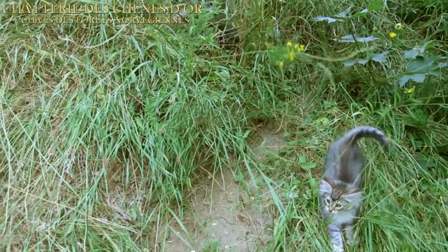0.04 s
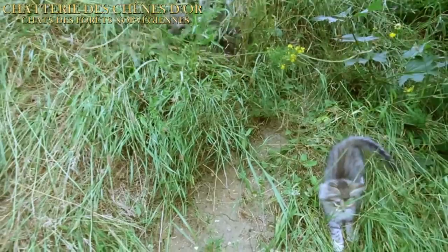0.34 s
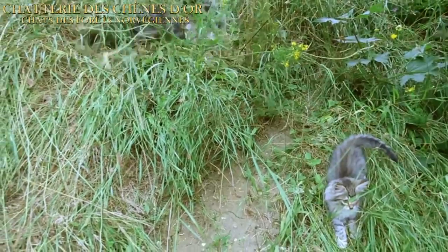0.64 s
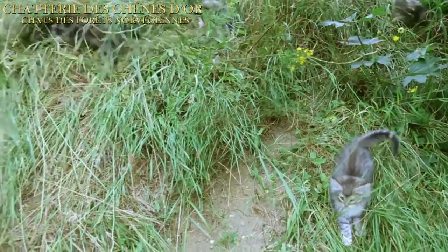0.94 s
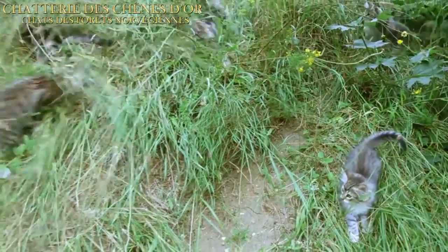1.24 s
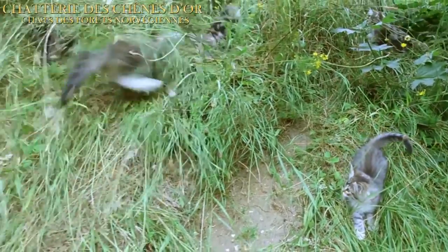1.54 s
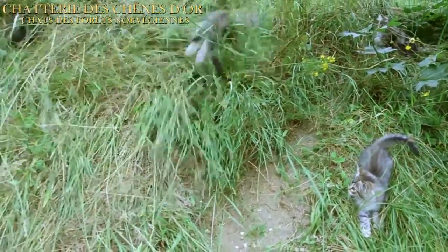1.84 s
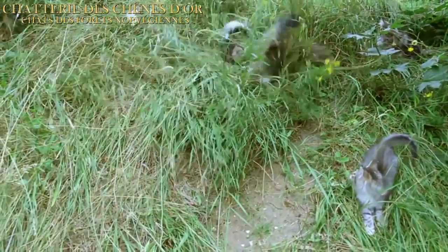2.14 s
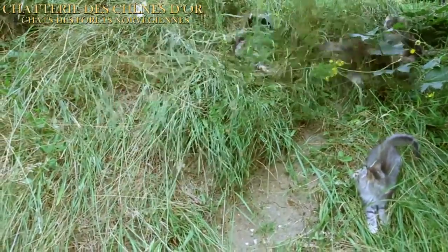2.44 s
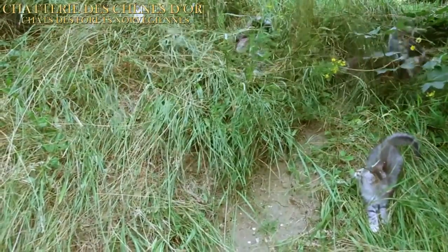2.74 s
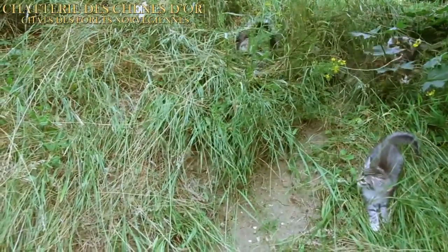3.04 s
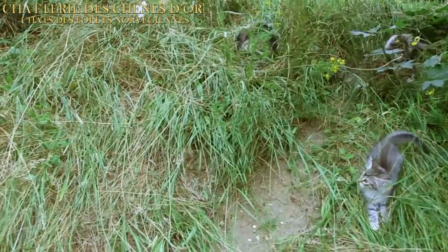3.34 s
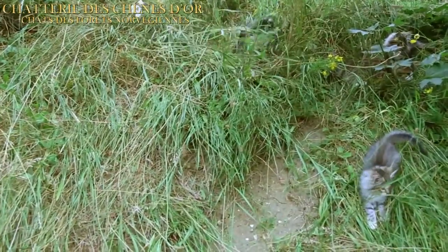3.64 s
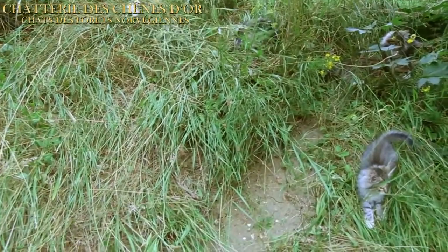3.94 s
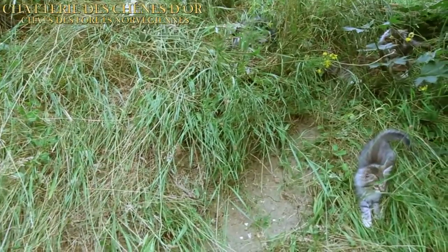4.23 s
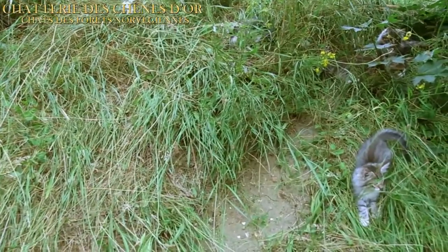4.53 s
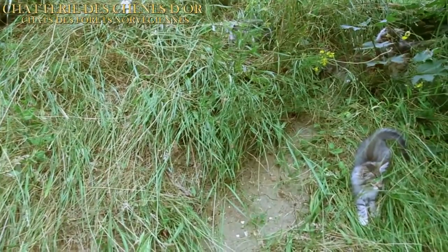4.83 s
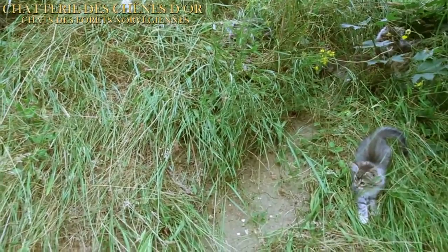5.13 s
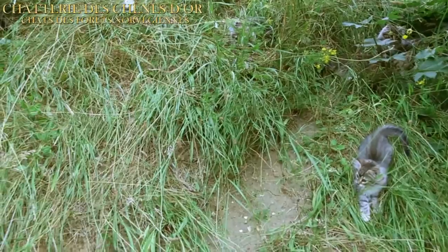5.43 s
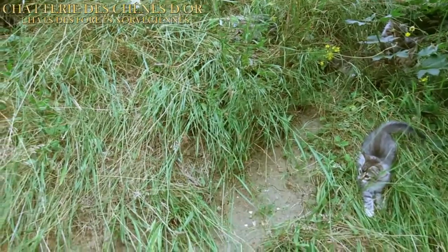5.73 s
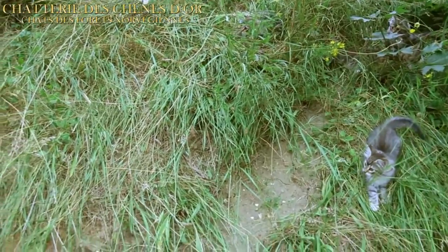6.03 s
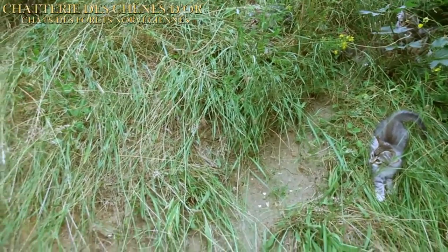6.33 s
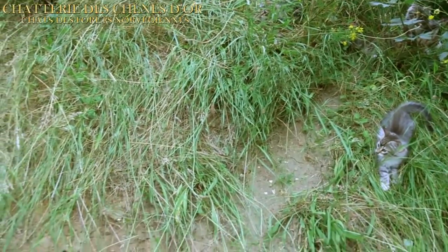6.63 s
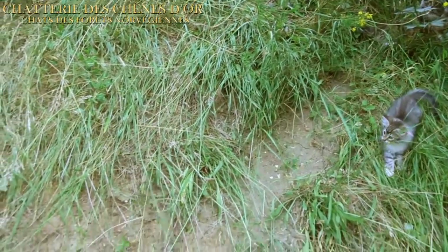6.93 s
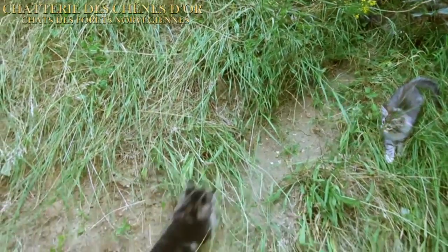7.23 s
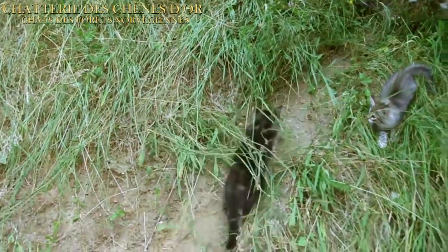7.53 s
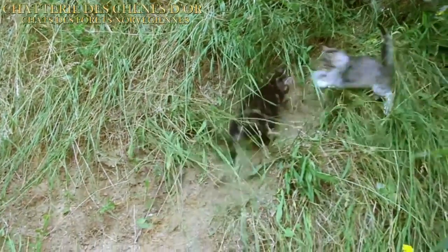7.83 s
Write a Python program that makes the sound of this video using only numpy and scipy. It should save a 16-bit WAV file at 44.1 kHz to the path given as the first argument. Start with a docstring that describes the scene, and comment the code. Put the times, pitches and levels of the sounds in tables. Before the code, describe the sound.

A small songbird opens with a quick run of gliding chirps to the left of the microphone. Faint, distant chirps follow under a high, airy hiss that surges, ticks lightly and falls away for a moment about halfway, leaving very quiet open air. After the hiss returns, another bird on the right finishes with five slightly hoarse, swooping whistles, the loudest calls. The place is grassy and open, with little echo.

```python
"""Short whistled chirps, like small songbirds in tall grass: a slurred phrase on the left, faint
distant slurs, and later five swooping calls on the right. Each note is a gliding, nearly pure tone.
Leaves scatter the whistles, and the microphone ports resonate near 3 kHz, so a note flares whenever
it glides through that pitch. A bright, steady-toned hiss, the same in both channels, swells, ticks
and drops away in steps over very quiet open air."""
import sys
import numpy as np
from scipy import signal
from scipy.fft import rfft, irfft
from scipy.io import wavfile
from scipy.ndimage import uniform_filter1d

SR = 44100
rng = np.random.default_rng(int(sys.argv[2]) if len(sys.argv) > 2 else 0)


def int16_out(signal):
    """Quantize to a 16-bit WAV file."""
    q = np.round(np.clip(np.atleast_2d(signal).T, -1, 1) * 32767)
    wavfile.write(sys.argv[1], SR, q.astype(np.int16))


N = 347067
TIME = np.arange(N) / SR
FREQ = np.maximum(np.fft.rfftfreq(N, 1 / SR), 1)
TOP_HZ = 14950


def left_bird():
    """Frequency modulation: a near bird sings one phrase of short, even glides."""
    # slurred notes: (time [s], length [s], first pitch [Hz], last pitch [Hz], level [dB])
    phrase = [(0.038, 0.024, 3420, 3300, -57), (0.061, .051, 3186, 3070, -54),
              (0.19, 0.031, 3250, 3170, -67), (0.228, 0.026, 2780, 2320, -51.5),
              (0.323, 0.033, 4160, 3760, -51.5), (0.37, 0.057, 3780, 3670, -57),
              (0.43, 0.036, 3274, 3140, -56), (0.477, 0.068, 3250, 3290, -52.5),
              (0.589, 0.014, 2620, 3140, -55.5), (0.604, .05, 2400, 2590, -51),
              (0.668, 0.033, 2850, 2930, -57), (0.747, 0.051, 2690, 2200, -53.5),
              (0.817, .022, 3010, 3100, -62.5)]
    song = whistle([slur(*row) for row in phrase], waver=.012, flutter_db=3, fade_s=.0033)
    return outdoors(song, pan_db=6, lag_s=.00004, near_db=-7.5, scatter_s=.02, far_db=-9.5, t60_s=.6)


def right_bird():
    """Frequency modulation: a near bird swoops widely, and stronger pitch jitter makes it hoarser."""
    # swooping calls: (time [s], fall [s], turning pitch [Hz], rise [s], flick [s], last pitch [Hz],
    # level [dB], sag [dB], flick [dB])
    calls = [(6.986, .044, 3073, .02, .008, 3450, -46, -19, -10),
             (7.175, .05, 3024, 0.02, .01, 3570, -44.5, -20, 4),
             (7.364, .04, 3076, 0.019, 0.017, 4840, -44, -11.5, 5),
             (7.556, .028, 3170, .017, 0.033, 1890, -43, -4, -2.5),
             (7.73, .026, 3117, .016, .031, 1850, -40.5, -2.5, -1)]
    # thin high notes: (time [s], length [s], first pitch [Hz], last pitch [Hz], level [dB])
    high_notes = [(6.869, .05, 4280, 4430, -54), (7.082, 0.033, 3930, 3970, -45.5),
                  (7.278, .024, 3890, 3960, -45), (7.461, .019, 4030, 4040, -40.5)]
    notes = [swoop(*row) for row in calls] + [slur(*row) for row in high_notes]
    song = whistle(notes, waver=.028, flutter_db=2.5, fade_s=.003)
    return outdoors(song, pan_db=-4, lag_s=-.00007, near_db=-6, scatter_s=.02, far_db=-12, t60_s=.45,
                    shade_hz=4000)


def far_bird(period_s=.093, slur_s=.0254, pitch_ratio=.85, spread_db=2):
    """Periodic repetition: a faint, distant bird gives down-slurs, alone or in evenly paced runs."""
    # runs of slurs: (time [s], length of the run [s], starting pitch [Hz], level [dB])
    runs = [(0.958, .04, 3290, -66), (1.107, .61, 3480, -67.5), (2.709, .23, 3480, -66.5),
            (3.023, .04, 3550, -67), (3.233, .04, 3550, -71), (3.56, .04, 3530, -65),
            (3.783, .04, 3740, -68), (6.245, .33, 3770, -71), (6.735, .04, 3400, -71)]
    notes = []
    for start, length, hz, db in runs:
        for at, strength in zip(np.arange(start, start + length, period_s), rng.standard_normal(8)):
            notes.append(slur(at, slur_s, hz, pitch_ratio * hz, db + spread_db * strength))
    song = whistle(notes, waver=.003, flutter_db=6.5, fade_s=.004)
    return outdoors(song, pan_db=0, lag_s=.0001, near_db=-7, scatter_s=.012, far_db=-16, t60_s=.5)


def slur(start, length, first_hz, last_hz, db):
    """A linear sweep that swells and falls back, as (time [s], pitch [Hz], level [dB]) points."""
    share = np.array([0, .45, 1])  # onset, peak, end
    swell_db = np.array([-4, 0, -3.5])
    hz = first_hz + (last_hz - first_hz) * share
    return np.column_stack([start + length * share, hz, db + swell_db])


def swoop(start, fall_s, low_hz, rise_s, flick_s, last_hz, db, sag_db, flick_db):
    """A curved sweep (sagging fall, loud climb, flick) as (time [s], pitch [Hz], level [dB]) points."""
    first_hz, crest_hz = 4575, 3435
    attack_s, recover_s = .0064, .0054
    onset_db, entry_db, crest_db = -6, 1, -6.5
    crest_s = fall_s + rise_s
    t = np.arange(0, crest_s + flick_s, 10 / SR)
    fall = np.clip(1 - t / fall_s, 0, 1) ** 1.5  # slows down
    rise = np.clip((t - fall_s) / rise_s, 0, 1)
    flick = np.clip((t - crest_s) / flick_s, 0, 1) ** 1.49  # speeds up
    hz = low_hz + (first_hz - low_hz) * fall + (crest_hz - low_hz) * rise + (last_hz - crest_hz) * flick
    turns_s = [0, attack_s, fall_s - recover_s, fall_s + recover_s, crest_s, crest_s + flick_s]
    effort_db = np.interp(t, turns_s, [onset_db, entry_db, sag_db, 0, crest_db, flick_db])
    return np.column_stack([start + t, hz, db + effort_db])


def whistle(notes, waver, flutter_db, fade_s, beak_hz=2520):
    """Phase is the integral of frequency: a sine follows each note, unsteady in pitch and strength."""
    out = np.zeros(N)
    drift = 1 + waver * walk(600)
    flutter = undb(flutter_db * walk(280))
    for note in notes:
        times, hz, db = np.transpose(note)
        on = (TIME > times[0] - fade_s) & (TIME < times[-1] + fade_s)
        t = TIME[on]
        pitch = uniform_filter1d(np.interp(t, times, hz), size=130) * drift[on]
        fade = np.clip(np.minimum(t - t[0], t[-1] - t) / fade_s, 0, 1)
        envelope = fade * flutter[on] * undb(np.interp(t, times, db))
        radiation = 1 / np.sqrt(1 + (beak_hz / pitch) ** 10)  # a small beak radiates low pitches poorly
        out[on] += radiation * envelope * np.sin(2 * np.pi * np.cumsum(pitch) / SR)
    return out


def outdoors(x, pan_db, lag_s, near_db, scatter_s, far_db, t60_s, shade_hz=4400, glint_db=7):
    """Multipath propagation: direct sound, quick echoes off ground and bushes, a thin tail from trees."""
    t = TIME[:SR]
    # leaves block the highest pitches on the direct path and scatter them instead
    passed = 1 / (1 + (FREQ / shade_hz) ** 10)
    shaded = rfft(x) * passed
    scattered = irfft(rfft(x) * (passed + undb(glint_db) * (1 - passed)), N)
    channels = []
    for side in (1, -1):
        bushes = rng.random(len(t)) < 1800 / SR  # about 1800 reflections a second
        near = bushes * rng.standard_normal(len(t)) * np.exp(-t / scatter_s) * (t > .002)
        far = rng.standard_normal(len(t)) * undb(-60 * t / t60_s) * np.minimum(t / .02, 1)
        echoes = undb(near_db) * near / np.linalg.norm(near) + undb(far_db) * far / np.linalg.norm(far)
        # with a positive lag the sound reaches the left port first
        direct = irfft(shaded * np.exp(1j * np.pi * FREQ * lag_s * side), N)
        channels.append(undb(side * pan_db / 2) * direct + signal.fftconvolve(scattered, echoes)[:N])
    return np.array(channels)


def ports(x, ring_hz=3171, width_hz=236, ring_db=19.5):
    """Cavity resonance: the air behind each microphone port rings at one pitch."""
    ring = undb(ring_db) / (1 + 1j * (FREQ / ring_hz - ring_hz / FREQ) * ring_hz / width_hz)
    return irfft(rfft(x) * (1 + ring), N)


def hiss(trim_db=-2, flicker_db=.98, grain_db=1.07):
    """Amplitude-modulated noise, bright and central: each surge swells, ticks, dips, ebbs and spurts."""
    # base level of the hiss: (time [s], level [dB])
    base = [(0, -46.5), (0.28, -48), (0.717, -60), (0.719, -46.5), (3.357, -46), (3.361, -57.5),
            (3.435, -55), (3.49, -83.5), (3.75, -68.5), (4.12, -57.5), (4.59, -53.5), (4.64, -47.5),
            (5.2, -44.5), (6.6, -43.5), (7.076, -54), (7.081, -46.5), (7.87, -45)]
    # spectrum of the hiss: (frequency [Hz], relative density [dB])
    hiss_colour = [(25, -20), (70, -15.5), (120, -10), (210, -12), (300, -17), (420, -16.5), (510, -12),
                   (620, -17), (1100, -10), (2000, -9), (4500, -4), (7500, -0.5), (11500, 0.5), (15000, -3)]
    # spectrum of the dry ticks: (frequency [Hz], relative density [dB])
    tick_colour = [(2000, -28), (5000, -46), (9500, -6), (11600, 11), (13000, -5), (15000, -17)]
    # surges, each with a tick near its top: (time of the tick [s], boost [dB])
    surges = [(0.811, 4.5), (1.414, 4), (1.978, 4), (2.575, 4), (5.615, 3), (7.174, 4.5)]
    # brief rises in level: (time [s], boost [dB])
    rises = [(0.07, 1), (3.105, 3.5), (4.44, 3), (4.925, 5), (5.045, 2), (5.195, 2.5), (5.33, 3.2),
             (6.14, 3.5), (7.7, 3)]
    attack_s, lead_s, hold_s, release_s = .088, .056, .08, .23  # lead and hold count from the tick
    dip_db, spurt_db, tick_db, soft_tick_db = -3, 2.5, -31.5, -42
    level_db = np.interp(TIME, *np.transpose(base)) + trim_db
    level_db += flicker_db * walk(60) + grain_db * walk(1500)
    level_db += sum(db * bump(at, width_s=.037) for at, db in rises)
    ticks = np.zeros(N)
    for at, db in surges:
        dip_at, spurt_at = at + .019, at + .424
        swell = np.interp(TIME - at, [-lead_s - attack_s, -lead_s, hold_s, hold_s + release_s],
                          [0, 1, 1, 0])
        level_db += db * swell
        level_db += dip_db * bump(dip_at, width_s=.016) + spurt_db * bump(spurt_at, width_s=.011)
        ticks += undb(tick_db) * bump(at, width_s=.00063, order=1)
        ticks += undb(soft_tick_db) * bump(spurt_at, width_s=.0056, order=1)
    return undb(level_db) * noise(hiss_colour) + ticks * noise(tick_colour)


def air(wander_db=.72, side_db=-1):
    """Partial coherence: quiet open air is alike on both sides in the bass and differs in the middle."""
    # level of the open air: (time [s], level [dB])
    levels = [(0, -68), (1.4, -70.5), (2.4, -71.5), (3.7, -71.8), (4.4, -73), (5.2, -74), (6.5, -73),
              (7.87, -71)]
    # spectrum common to both channels: (frequency [Hz], relative density [dB])
    mid_colour = [(30, -30), (120, -22), (230, -10), (380, 0), (650, 3), (1500, -0.5), (2400, 0),
                  (3200, 3.5), (4500, 0), (7000, -37), (11000, -24), (15000, -21)]
    # weighting of that spectrum for the antiphase part: (frequency [Hz], relative gain [dB])
    width = [(100, -12.5), (700, -3), (4500, 0), (7000, -31)]
    hz, db = np.transpose(mid_colour)
    side_colour = np.column_stack([hz, db + np.interp(hz, *np.transpose(width))])
    level_db = np.interp(TIME, *np.transpose(levels)) + wander_db * walk(25)
    mid = noise(mid_colour)
    side = undb(side_db) * noise(side_colour)
    return undb(level_db) * np.array([mid + side, mid - side])


def noise(colour):
    """Spectral shaping: noise of rms 1 that follows (frequency [Hz], relative density [dB]) points."""
    hz, db = np.transpose(colour)
    gain = undb(np.interp(np.log(FREQ), np.log(hz), db)) * (FREQ < TOP_HZ)
    x = irfft(rfft(rng.standard_normal(N)) * gain, N)
    return x / x.std()


def walk(rate_hz):
    """Low-pass noise: smoothed random steps with a spread near 1."""
    hold = max(int(SR / rate_hz), 1)
    steps = np.repeat(rng.standard_normal(N // hold + 1), hold)
    return 1.3 * uniform_filter1d(uniform_filter1d(steps, hold), hold)[:N]


def bump(at, width_s, order=2):
    """A pulse envelope of height 1: Gaussian for order 2, a pointed exponential for order 1."""
    return np.exp(-np.minimum(np.abs(TIME - at) / width_s, 20) ** order)


def undb(db):
    """Amplitude ratio from decibels."""
    return 10 ** (np.asarray(db) / 20)


def scene():
    """Superposition: birds and air through the resonant ports, with the hiss over them."""
    return ports(left_bird() + right_bird() + far_bird() + air()) + hiss()


def record(dry):
    """Band limiting: a steep low-pass filter cuts the highest treble."""
    return signal.sosfilt(signal.ellip(10, .2, 70, TOP_HZ, fs=SR, output="sos"), dry)


dry = scene()
out = record(dry)
int16_out(out)
```